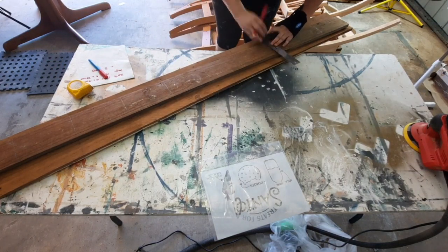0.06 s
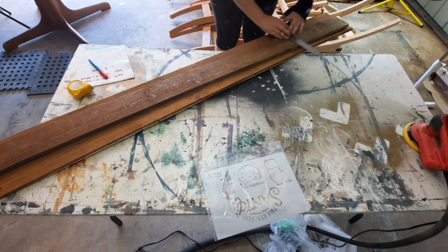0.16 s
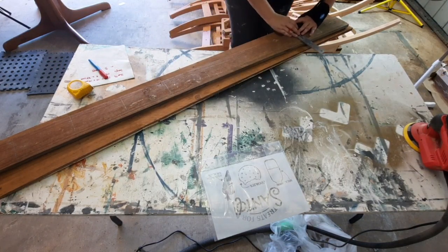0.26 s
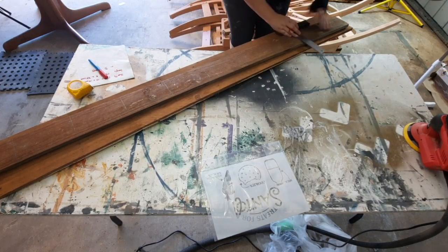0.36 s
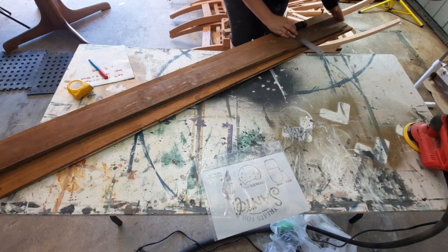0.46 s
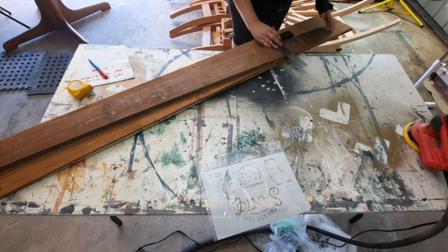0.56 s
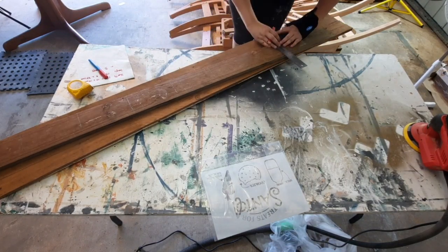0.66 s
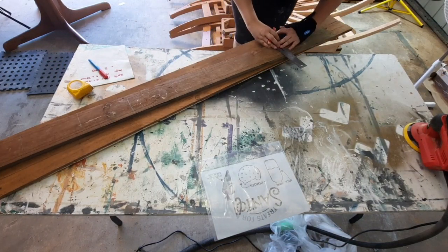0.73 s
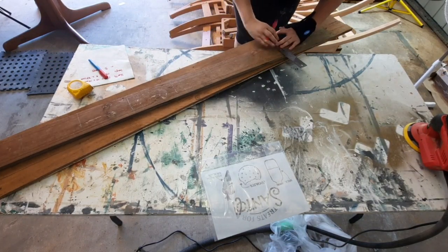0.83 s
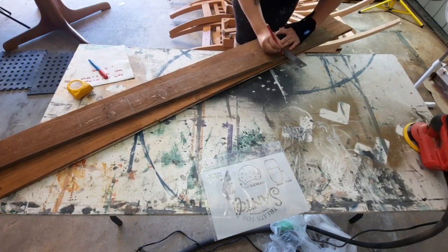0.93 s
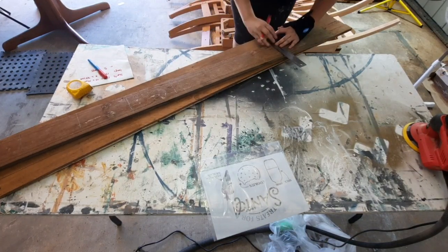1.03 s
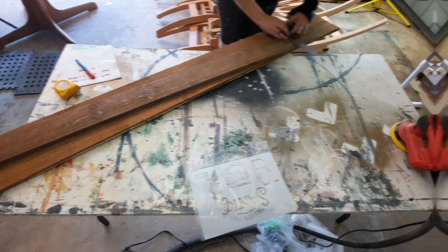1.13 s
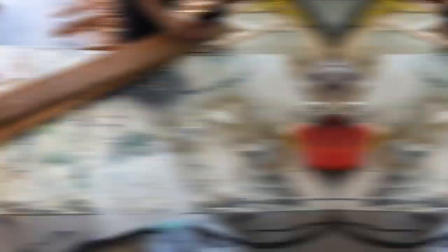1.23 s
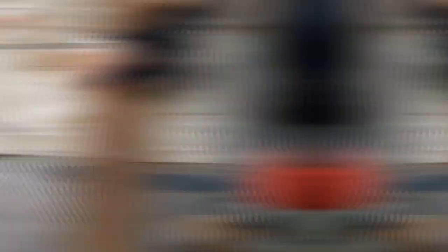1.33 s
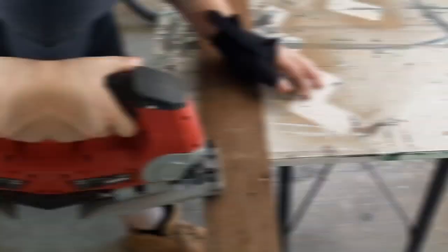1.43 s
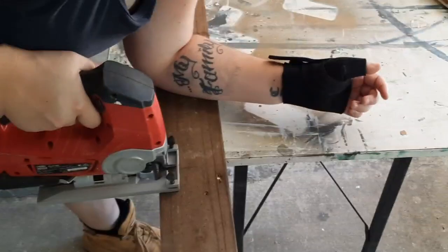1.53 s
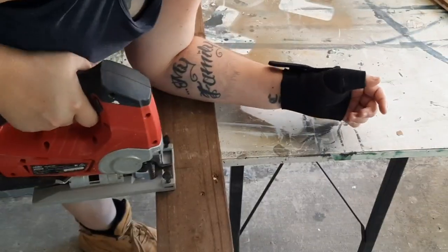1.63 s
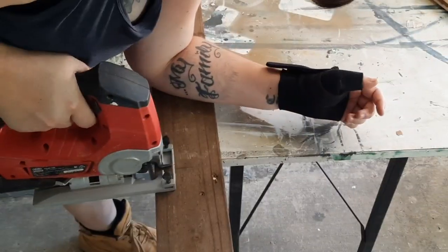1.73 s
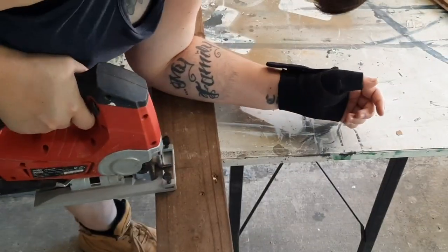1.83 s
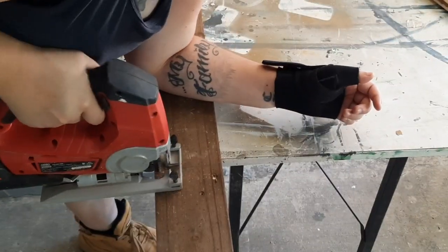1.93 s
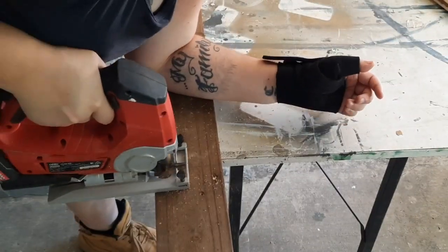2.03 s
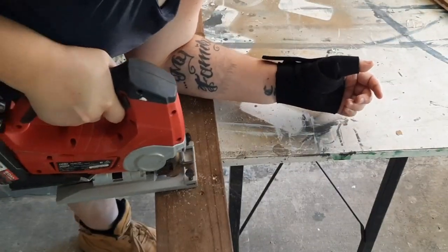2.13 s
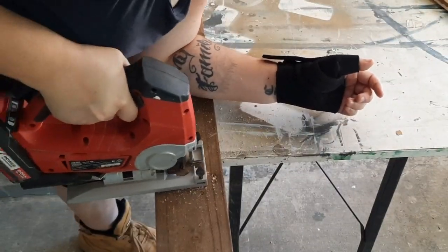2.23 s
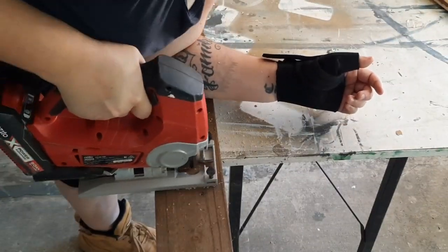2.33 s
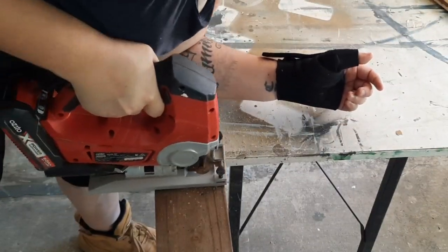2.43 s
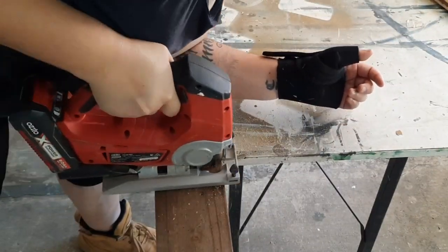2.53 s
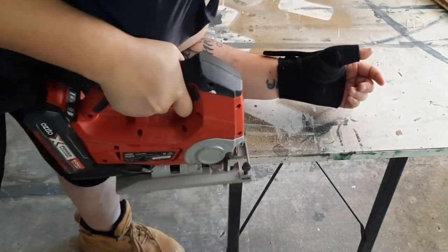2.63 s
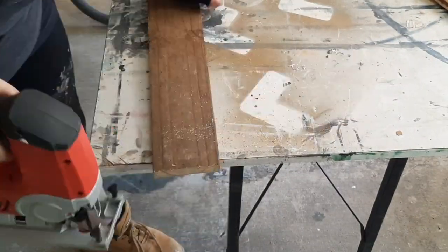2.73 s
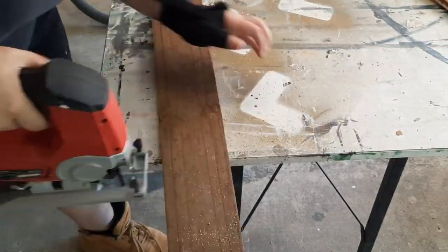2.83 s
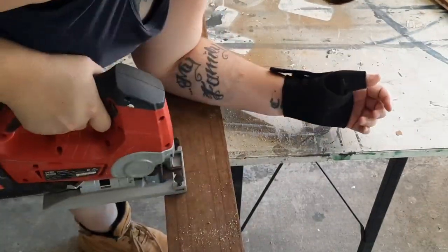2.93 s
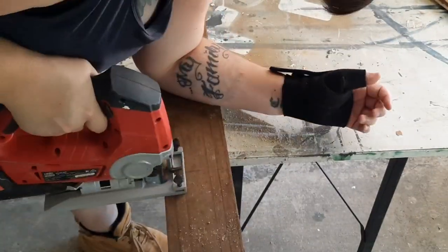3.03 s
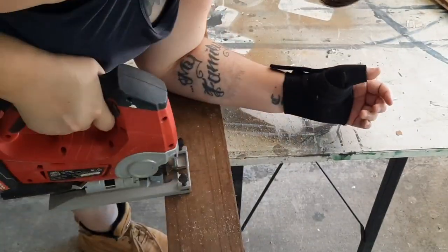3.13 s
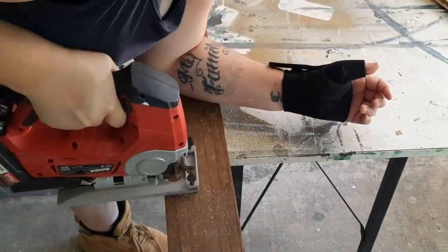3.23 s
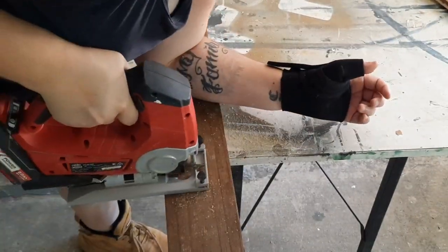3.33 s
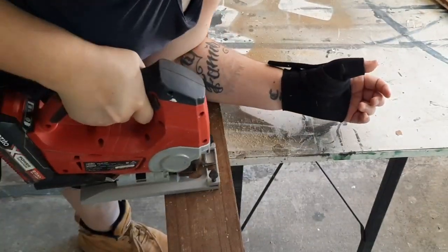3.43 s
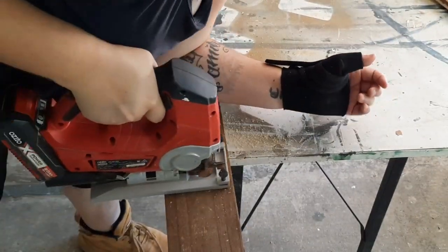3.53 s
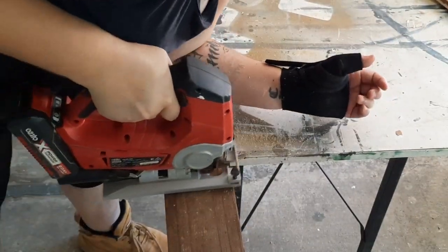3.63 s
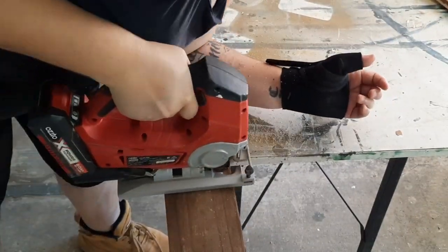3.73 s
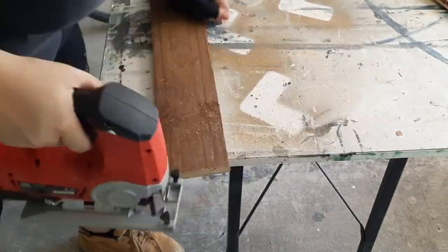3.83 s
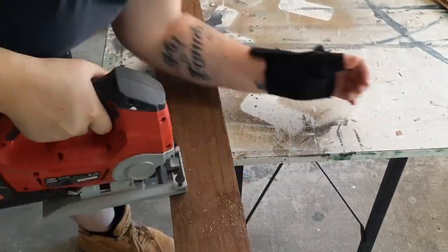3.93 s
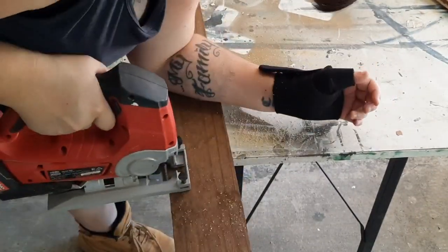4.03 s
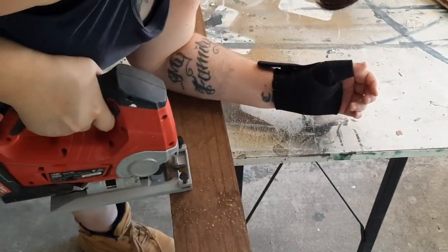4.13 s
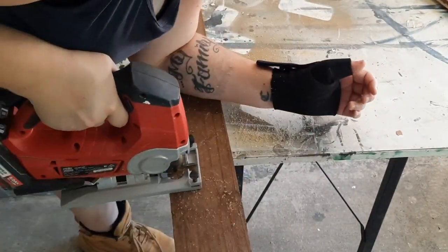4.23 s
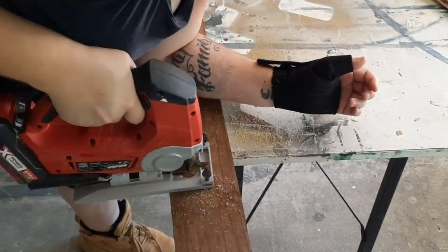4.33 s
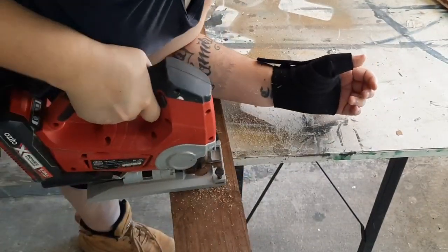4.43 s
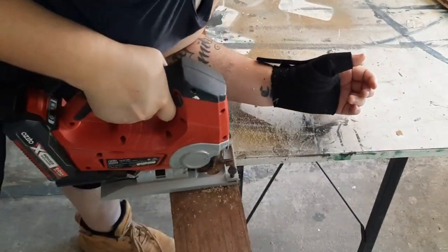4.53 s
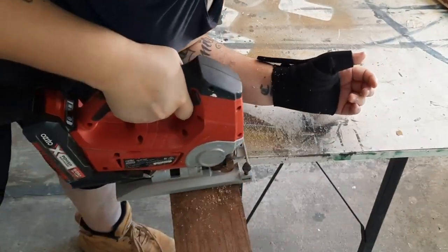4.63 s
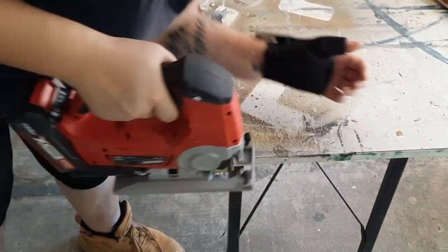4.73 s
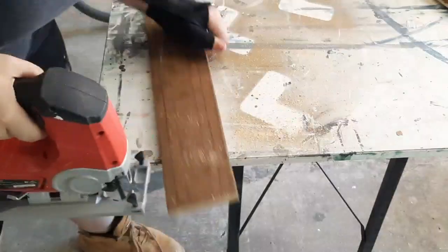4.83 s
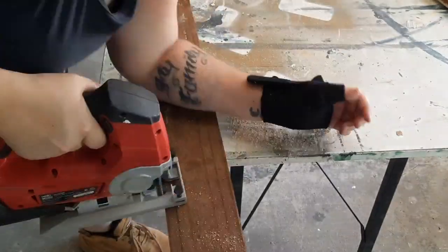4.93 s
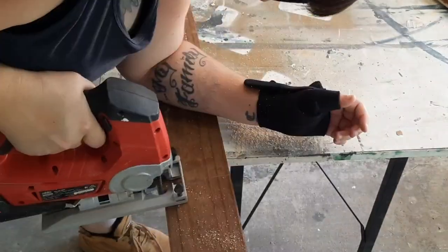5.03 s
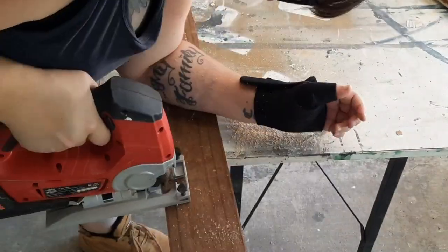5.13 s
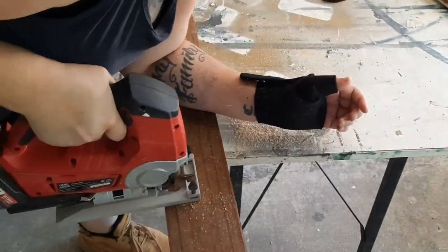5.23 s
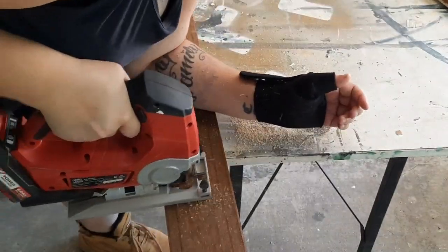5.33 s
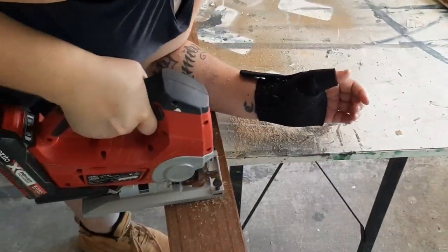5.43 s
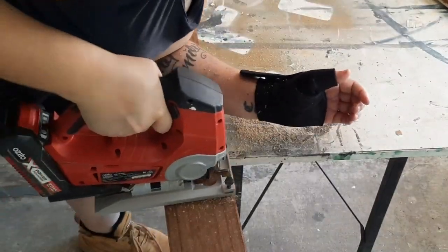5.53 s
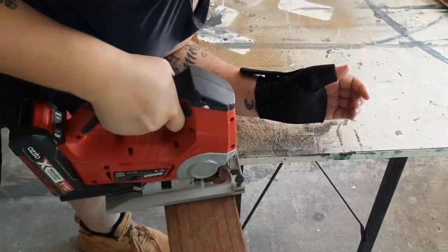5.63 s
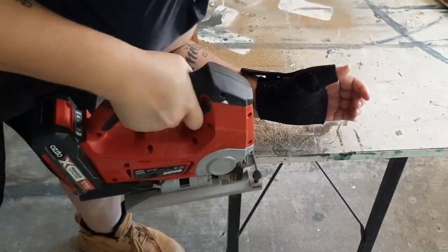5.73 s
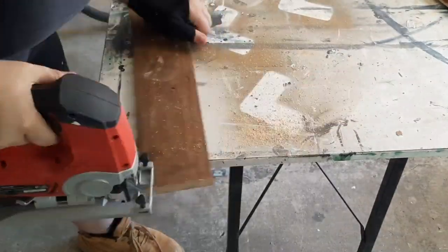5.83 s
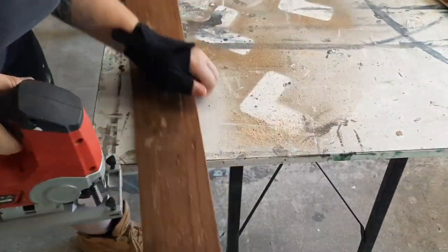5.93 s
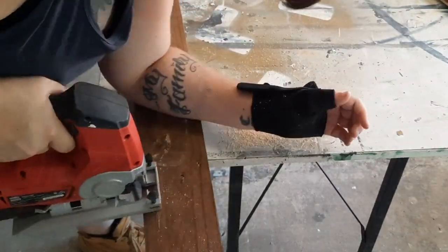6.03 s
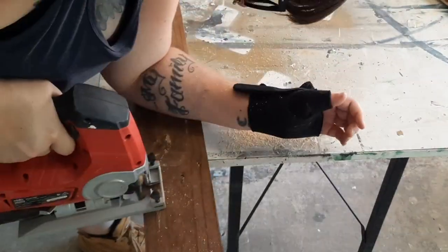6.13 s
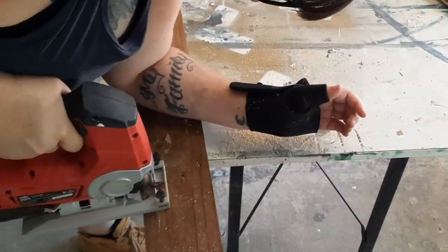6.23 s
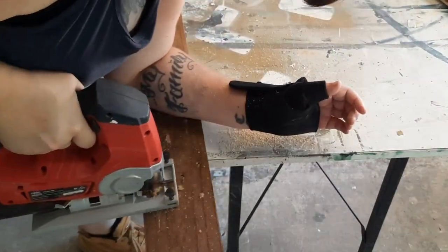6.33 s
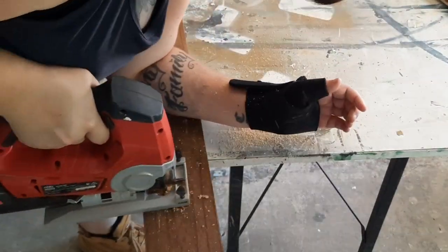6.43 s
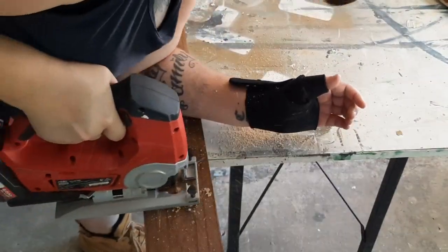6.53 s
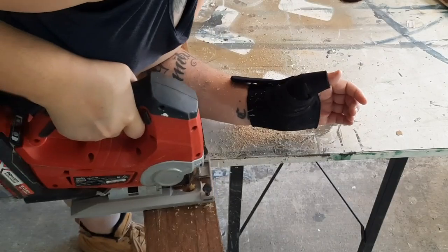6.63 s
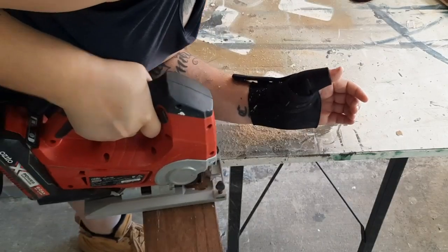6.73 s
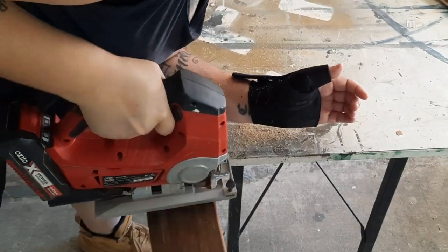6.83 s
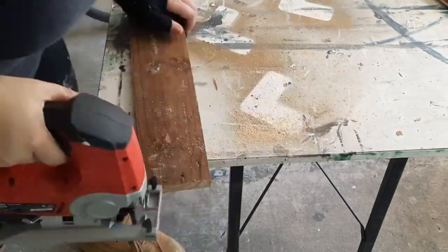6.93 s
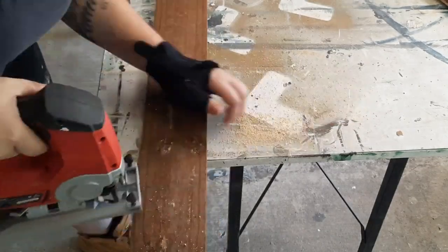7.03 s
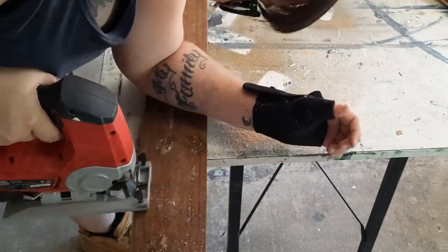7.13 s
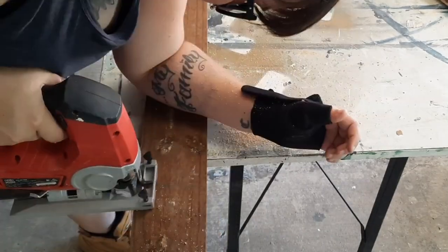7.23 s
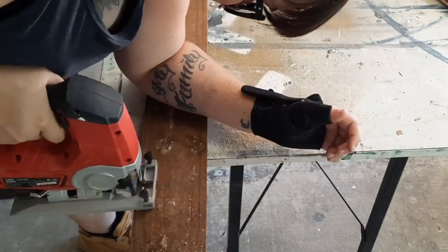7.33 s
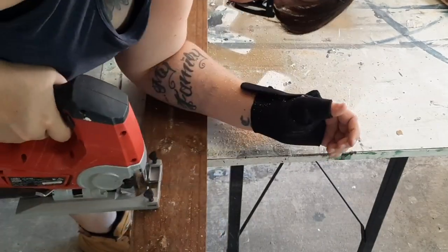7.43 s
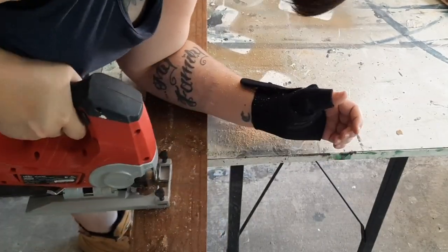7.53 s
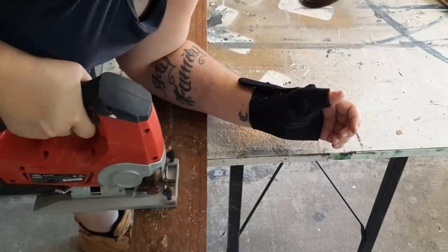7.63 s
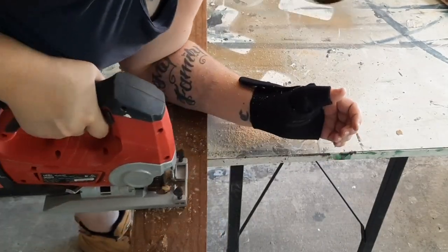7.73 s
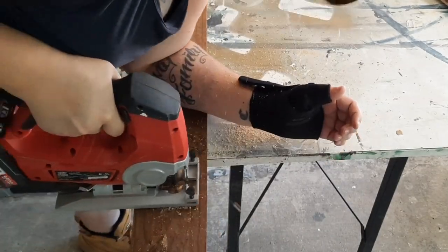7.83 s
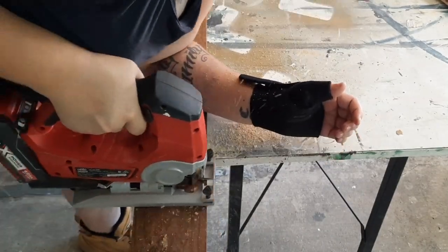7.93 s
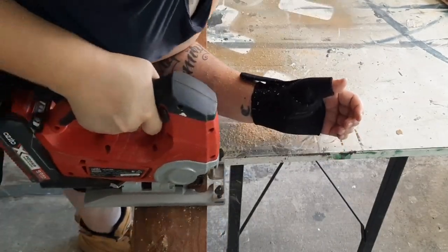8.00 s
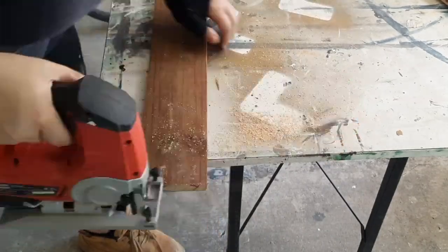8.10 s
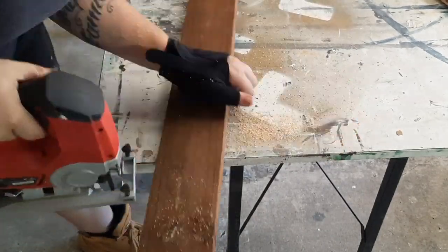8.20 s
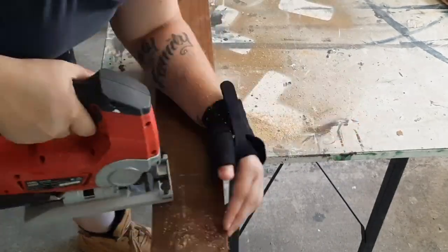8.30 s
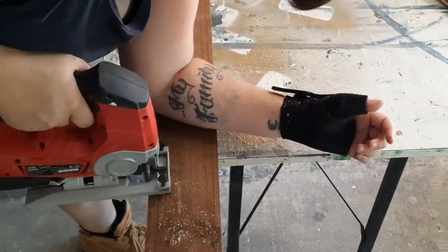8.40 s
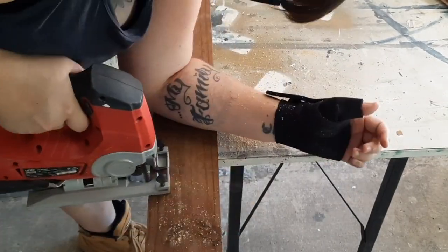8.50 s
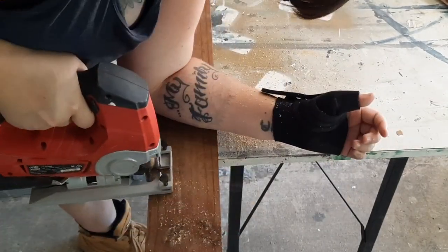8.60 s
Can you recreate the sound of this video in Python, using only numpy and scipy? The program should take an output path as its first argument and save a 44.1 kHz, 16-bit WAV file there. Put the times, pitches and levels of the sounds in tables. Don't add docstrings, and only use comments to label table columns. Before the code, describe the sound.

From 0 to about 1.3 s, a quiet shed with low, far rumble: a steel square and pencil scrape, ring and tap on timber, with knocks near 0.5 and 1.1 s and faint high bird chirps outside. The rumble fades out and a faint fan hum and air creep in. At 1.8 s a cordless jigsaw starts abruptly, close and loud, with harsh wood rasp, metallic gear rattle around a nasal mid pitch and a booming board, until 2.65 s. More cuts run at 3.0-3.75, 4.1-4.7, 5.05-5.75, 6.1-6.85 and 7.35-8.05 s, surging as the saw is pushed. Each stops in a short stuttering squeal, followed by wooden clacks, soft thuds and slight board rubs while hum and air recover. Clacks cluster near 6.7 and 8.1 s. A final brief cut starts at 8.53 s. The whole sound flutters slightly.

```python
import sys
import numpy as np
from scipy import signal
from scipy.fft import rfft, irfft
from scipy.io import wavfile
from scipy.ndimage import uniform_filter1d

SR = 44100
rng = np.random.default_rng(int(sys.argv[2]) if len(sys.argv) > 2 else 0)


def invert_db(level):
    return 10 ** (np.asarray(level, dtype=float) / 20)


def wav_record(signal):
    frames = np.transpose(np.atleast_2d(signal))
    bounded = np.clip(frames, -1, 1)
    quanta = np.round(bounded * 32767).astype(np.int16)
    wavfile.write(sys.argv[1], SR, quanta)


N = 381906
HOP, FIRST = 1024, 400
COUNT = N // HOP + 2
MIDDLE = (FIRST + HOP * np.arange(COUNT)) / SR
HZ = np.fft.rfftfreq(2 * HOP, 1 / SR)

# (frequency [Hz], density [dB per Hz])
RASP = [(290, -41), (500, -12.5), (569, -14.5), (677, -2.5), (793, -7), (1280, -5), (1800, -10), (2050, -3),
        (3160, -6.5), (7620, -15.5), (10000, -20.5), (12300, -17), (15700, -23)]
# (start [s], end [s])
TRIGGER = [(1.8, 2.645), (3.002, 3.759), (4.088, 4.711), (5.064, 5.733), (6.104, 6.87), (7.326, 8.055),
           (8.529, 8.68)]


def jigsaw():
    # (frequency [Hz], bandwidth [Hz])
    casing = [(1400, 52), (1490, 115), (1622, 51), (1700, 8.2), (1771, 40), (1860, 27), (1945, 47),
              (2150, 8), (2420, 13), (2640, 42)]
    # (frequency [Hz], bandwidth [Hz], level [dB])
    board = [(88, 46, -17.5), (131.4, 13.5, -1.5), (184, 18.7, -5.5), (308, 17.3, -1.5), (400.6, 13, 1),
             (498.5, 26.4, -5.5), (689, 99, -10), (847, 18.5, -8), (968, 24, -7)]
    rasp_db, board_db, gear_hz, gear_db = cutting()
    load = rasp_db + 1.33 * rng.standard_normal(COUNT)
    gear_hz = (gear_hz * (1 + 0.008 * rng.standard_normal(COUNT)))[:, None]
    mesh = (ring(gear_hz, 250) + 0.32 * ring(2430, 600)) * (0.14 + modes(casing, scatter_db=3.5))
    gear_db = load + gear_db - 0.7 + 0.35 * rng.standard_normal(COUNT)
    board_db = load + board_db + 0.54 + 0.096 * rng.standard_normal(COUNT)
    body = level(mesh, gear_db) + level(modes(board, scatter_db=2.5), board_db)

    rasp = level(invert_db(along(RASP)), load + 5.64)
    bite = 1 / (1 + (HZ / 2900) ** 4)
    air_swells = strokes(depth_db=6.5) * lumps(depth_db=1.0, size=30)
    tooth_swells = strokes(depth_db=9) * lumps(depth_db=2.5, size=140)
    jolts = strokes(depth_db=7) * lumps(depth_db=2.3, size=120)
    air = heard(rasp * np.sqrt(1 - bite), air_swells)
    teeth = heard(rasp * np.sqrt(bite), tooth_swells)
    return air + teeth + heard(body, jolts, locked=0.75)


def cutting():
    # (rasp [dB], board [dB], rattle re rasp [dB])
    cut_levels = [(-43, -45.5, -.5), (-42.5, -45, 0.5), (-43, -44, 1.1), (-43, -45.5, 0),
                  (-44.5, -48.5, -1), (-41.5, -43, -1.5), (-42, -47, -8.5)]
    # (middle [s], push [dB], half length [s])
    pushes = [(1.917, 4, 0.053), (2.135, 5, 0.047), (2.274, 3.5, .04), (2.445, 8, 0.07),
              (2.604, 1.5, 0.049), (3.134, 3.5, 0.051), (3.34, 4.5, 0.043), (3.626, 8.5, 0.072),
              (4.146, 0, 0.072), (4.24, 3, 0.063), (4.364, -0.5, 0.033), (4.575, 4, 0.06),
              (5.157, 5.5, 0.039), (5.331, 5, 0.051), (5.418, -0.5, 0.04), (5.56, 8.5, 0.08),
              (6.178, 6, 0.043), (6.299, 8, 0.066), (6.41, 8, 0.031), (6.516, 5.5, 0.055),
              (6.687, 10.5, 0.12), (7.444, 4, 0.047), (7.58, -2, 0.051), (7.77, -1.5, .06),
              (7.911, 2, 0.021), (8.65, 10, 0.03)]
    # (time [s], rate [Hz], rattle re its usual level [dB])
    mesh_curves = [
        [(1.82, 1640, -0.5), (1.988, 1550, -2), (2.04, 1820, -6), (2.132, 1690, 1), (2.19, 1840, -1.5),
         (2.53, 1780, 1.5), (2.556, 1900, -0.5), (2.64, 1800, -2)],
        [(3.01, 1790, 3), (3.092, 1850, -0.5), (3.174, 1760, 1.5), (3.238, 1880, -3), (3.338, 1810, 0),
         (3.49, 1970, -1), (3.626, 1640, 0), (3.75, 1950, -6)],
        [(4.1, 1630, -5.5), (4.172, 1640, 1), (4.252, 1830, -0.5), (4.484, 1890, -1.5), (4.554, 1740, -0.5),
         (4.7, 1870, 0)],
        [(5.07, 1770, 0.5), (5.098, 1850, -1.5), (5.204, 1710, 1.5), (5.424, 1910, -3), (5.576, 1570, -2),
         (5.72, 1900, -2.5)],
        [(6.12, 1840, -12), (6.204, 1660, 0.5), (6.266, 1620, 3), (6.312, 1880, -0.5), (6.496, 1840, -1),
         (6.746, 1750, -0.5), (6.86, 1840, -6.5)],
        [(7.35, 1700, 7), (7.418, 1610, -5), (7.448, 1750, 0.5), (7.624, 1910, -3), (7.738, 1750, 2.5),
         (7.772, 1900, 0.5), (7.926, 1740, 2), (8.05, 1815, 0)],
    ]
    spin_up_db, spin_up_s = 9.5, 0.0033
    exit_db, exit_s = 1.5, 0.14
    rasp_follows, rattle_follows = 0.25, 0.49
    rattle_late_db, bite_s = 4, 0.13

    cuts = np.hstack([TRIGGER, cut_levels])
    start, end, rasp_db, board_db, rattle_db = cuts[latest(cuts[:, 0], MIDDLE)].T
    since, left = abs(MIDDLE - start), abs(end - MIDDLE)
    on = (MIDDLE >= start) & (MIDDLE <= end)
    s, push_db, half_s = np.transpose(pushes)[..., None]
    bump = np.exp(-((MIDDLE - s) / half_s) ** 2)
    push = np.sum(bump * push_db, axis=0)
    mesh_hz, grind_db = per_slice(np.vstack(mesh_curves))
    edges_db = spin_up_db * np.exp(-since / spin_up_s) + exit_db * np.exp(-left / exit_s)
    rattle_db = rattle_db + grind_db + (rattle_follows - rasp_follows) * push
    rattle_db = rattle_db + rattle_late_db * (1 - np.exp(-since / bite_s))
    rasp_db = rasp_db + rasp_follows * push
    return np.where(on, rasp_db - edges_db, -150), board_db + push - rasp_db, mesh_hz, rattle_db


def snags():
    # (time [s], peak [dB], ring [Hz])
    snag_rows = [(1.883, -29, 640), (2.024, -32, 1830), (2.253, -30, 1740), (2.488, -26, 1750),
                 (2.537, -31, 1920), (2.997, -27, 1125), (3.3, -21, 1765), (3.583, -29, 997),
                 (3.672, -30, 1764), (3.73, -28, 1910), (4.299, -29, 1800), (4.387, -26, 1830),
                 (4.442, -32.5, 2300), (4.578, -25.5, 1744), (4.649, -25, 1830), (4.672, -28, 1910),
                 (5.085, -23, 964), (5.133, -26, 1750), (5.291, -25, 1753), (5.446, -29, 1880),
                 (5.556, -26, 910), (5.578, -30, 1590), (5.655, -28.5, 1770), (5.673, -23.5, 1830),
                 (5.695, -28, 1890), (6.44, -32, 1910), (6.593, -30, 1750), (6.837, -31, 1930),
                 (7.391, -26.5, 1580)]
    return bursts(snag_rows, rise_s=0.0012, fall_s=0.012, db=-6)


def drums():
    # (time [s], peak [dB], ring [Hz])
    drum_rows = [(1.936, -32, 525), (2.024, -38, 392), (2.141, -31, 473), (2.256, -36, 442),
                 (2.411, -33, 495), (2.995, -35, 480), (3.14, -33, 407), (3.312, -35, 497),
                 (3.58, -33, 390), (4.095, -31, 470), (4.322, -35, 406), (4.882, -39.5, 446),
                 (5.105, -39, 503), (5.185, -35, 288), (5.272, -30.5, 415), (5.555, -30, 437),
                 (5.823, -45, 386), (5.968, -42, 296), (6.617, -35, 404), (6.677, -42, 323),
                 (6.805, -40, 296), (7.019, -45, 344), (7.335, -36, 527), (7.437, -32, 382),
                 (7.475, -29, 408), (7.925, -29.5, 420)]
    return bursts(drum_rows, rise_s=0.0023, fall_s=0.017, db=-3)


def brake():
    # (time [s], length [s], main ring [dB], low ring re main [dB], high ring re main [dB])
    squeals = [(2.656, 0, -33.5, 3, -10), (2.703, 0, -44, 2, -5), (2.726, 0.01, -48.5, 6, -14),
               (3.794, 0, -46, 2, 5), (3.84, 0, -51, 6, -8), (4.746, 0.012, -36, -7, -8),
               (4.792, 0, -47, 5.5, -11), (5.768, 0, -46.5, 2, -2), (5.791, 0, -66, 18, 0),
               (6.882, 0.027, -38, -3, -10), (8.066, 0, -39, 5, -15), (8.09, 0, -66, 17, -6)]
    # (frequency [Hz], bandwidth [Hz])
    housing = [
        (2470, 75),
        (1460, 160),
        (3470, 170),
        (5070, 60),
        (5700, 50),
    ]
    # (frequency [Hz], density [dB per Hz])
    whirr_points = [(60, -38), (150, 10), (400, 7), (900, 8.5), (2000, 15.5), (3200, 11.5), (7600, -6),
                    (10000, -25), (12300, -23), (15800, -44)]
    whirr_under_db = -16
    squeal_db = in_slices(squeals, arch_db=8)
    main_db, low_db, high_db = squeal_db + 1.1 * rng.standard_normal((3, COUNT))
    whirr_db, whine_db, grip_hz = coasting()
    tune = 1 + 0.0069 * rng.standard_normal((5, COUNT, 1))
    tune[:2] *= grip_hz[..., None] / np.array(housing)[:2, :1, None]
    main, low, high, *top = [ring(hz * k, w) * ring(hz * k, 11 * w) for (hz, w), k in zip(housing, tune)]
    rings = level(main + 0.03 * sum(top), main_db + 0.33)
    rings = rings + level(low, main_db + low_db - 8.5) + level(high, main_db + high_db - 3.0)
    whine = level(invert_db(along(RASP)) * (HZ > 5000), whine_db)
    whirr = level(invert_db(along(whirr_points)), np.maximum(whirr_db, main_db + whirr_under_db) + 10.0)
    return heard(rings + whine + whirr, lumps(depth_db=3.5, size=220), locked=0.22)


def coasting():
    # (time [s], coasting [s], whirr [dB], main ring [Hz], low ring [Hz])
    stops = np.array([(2.656, .015, -46.5, 2483, 1420), (3.771, .035, -50, 2400, 1430),
                      (4.723, .075, -52, 2350, 1480), (5.744, .03, -54, 2460, 1500),
                      (6.882, .03, -56.5, 2464, 1300), (8.066, .03, -58.5, 2360, 1410)])
    whirr_fall_db, whine_fall_db = 68, 330
    whine_re_whirr_db = -10
    half_slice = HOP / SR / 2
    s, length, whirr_db, *grip_hz = stops[latest(stops[:, 0], MIDDLE + half_slice)].T
    since = MIDDLE - s
    on = (since > -half_slice) & (since < length)
    whine_db = np.where(on, whirr_db + whine_re_whirr_db - whine_fall_db * since, -150)
    return np.where(on, whirr_db - whirr_fall_db * since, -150), whine_db, np.array(grip_hz)


def walls(x):
    tail_db, t60_s = -21.5, 0.089
    t = np.arange(SR // 4) / SR
    tail = uniform_filter1d(rng.standard_normal((2, len(t))), size=4) * invert_db(-60 * t / t60_s)
    return x + invert_db(tail_db) * signal.fftconvolve(x, tail / np.linalg.norm(tail[0]), axes=1)[:, :N]


def clacks():
    # (time [s], peak [dB], ring [Hz], t60 [s])
    clack_rows = [(0.485, -33, 930, 0.035), (1.125, -36, 1040, 0.051), (3.605, -29, 1516, 0.029),
                  (3.832, -37.5, 1180, 0.063), (5.776, -34, 1470, 0.046), (6.693, -24, 880, 0.032),
                  (6.718, -19.5, 860, 0.037), (4.092, -29, 850, 0.061), (6.125, -33.5, 993, 0.11),
                  (7.347, -29, 1620, 0.062), (8.6, -32.5, 1045, 0.069), (7.928, -23.5, 818, 0.035),
                  (8.067, -23.5, 1310, 0.044), (8.077, -23, 1510, 0.017), (8.111, -21, 1186, 0.042)]
    return knocks(clack_rows, spread=0.038, puff=0.89, puff_hz=2840, tick=0.013)


def thuds():
    # (time [s], peak [dB], ring [Hz], t60 [s])
    thud_rows = [(2.832, -39, 194, 0.095), (3.899, -48.5, 362, 0.11), (4.876, -34.5, 417, 0.089),
                 (5.825, -40, 507, 0.057), (5.845, -38, 380, 0.057), (5.967, -30.5, 303, 0.042),
                 (7.016, -32, 357, 0.071), (8.246, -44.5, 323, 0.12)]
    return knocks(thud_rows, spread=0.083, puff=0.41, puff_hz=2040, tick=0)


def rubs():
    # (time [s], length [s], scrape [dB], bench boom re scrape [dB], hiss re scrape [dB])
    drags = [(.009, 0.032, -40.5, -2.5, -13), (.102, 0.012, -42.5, 1, -18), (.148, 0.038, -48, 2.5, -7),
             (.473, 0.068, -37.5, 2, -12), (.961, 0.053, -46.5, -6, -11.5), (1.124, 0.049, -52.5, 4, -7),
             (5.93, 0.025, -57, 1, -17.5), (7.021, 0, -48.5, -1, -30), (8.229, 0.018, -60, 1, -15)]
    # (time [s], scrape [dB], bench boom re scrape [dB], hiss re scrape [dB])
    shoves = [(2.842, -75, 24, -30), (3.91, -84, 22, -30), (4.073, -63, -12, -8), (4.885, -58, 8, -54),
              (5.838, -73, 15, -30), (5.861, -76, 3, -30), (6.975, -70, -9, -21), (8.3, -67, 3, -15),
              (1.5, -84, -3, 2), (6.005, -82.5, 0, 7.5), (7.155, -86.5, 0, 7.5), (8.37, -77, 11, -1),
              (2.87, -83, 0, 4)]
    # (frequency [Hz], bandwidth [Hz])
    square = [(880, 100), (1120, 48), (1680, 81), (2450, 21), (2850, 97)]
    # (frequency [Hz], density [dB per Hz])
    scrape_points = [(300, -27), (700, 11.5), (1100, 7.5), (1700, 12.5), (2600, 7), (4000, -12),
                     (5000, -49)]
    boom_points = [(50, -47), (110, 3.5), (200, -7.5), (380, -6), (600, -12.5), (900, -58.5)]
    hiss_points = [(2500, -8.5), (3500, 5.5), (7500, -1), (9500, -10), (12500, -7.5), (15900, -18)]
    rows = [*drags, *[(s, 0, *db) for s, *db in shoves]]
    scrape_db, boom_db, hiss_db = in_slices(rows, arch_db=12.5) + 1.1 * rng.standard_normal((3, COUNT))
    laid_on = np.where(MIDDLE < 0.12, 0.6, 0.3)[:, None]
    steel = np.abs(modes(square, scatter_db=8.5)) * laid_on
    colour = level(invert_db(along(scrape_points)) * (0.35 + steel), scrape_db + 0.36)
    colour = colour + level(invert_db(along(boom_points)), scrape_db + boom_db + 0.19)
    colour = colour + level(invert_db(along(hiss_points)), scrape_db + hiss_db + 5.5)
    return heard(colour, lumps(depth_db=2.5, size=60), lag=0)


def sings():
    # (time [s], peak [dB], ring [Hz])
    sing_rows = [(.018, -29, 870), (.024, -31, 2410), (.026, -46, 3850), (.14, -40, 707), (.162, -45, 1850),
                 (.965, -45, 2150), (.98, -41, 2400), (.985, -49, 1500), (1.135, -51, 1700),
                 (1.15, -48, 2710), (3.782, -46, 1400), (3.788, -46, 2100), (.088, -35, 1716),
                 (.09, -39, 1100), (.092, -54, 2830), (2.7, -50, 3400), (2.75, -62, 1750),
                 (2.77, -56.5, 1800), (2.812, -64, 1800)]
    return bursts(sing_rows, rise_s=0.004, fall_s=0.018, db=-1.0)


def birds():
    # (time [s], pitch of the strong octave [Hz], glide [Hz], level [dB])
    chirps = [(.218, 5600, -500, -55.5), (0.323, 5040, 847, -59), (.45, 5400, 2, -62), (.566, 5720, 0, -59),
              (.682, 5600, 0, -69), (.798, 5800, 2, -63), (.915, 5960, -200, -57), (1.03, 5230, -1, -58),
              (1.146, 5540, -4, -63), (1.263, 5150, 498, -71.5)]
    out, t = np.zeros((2, N)), (np.arange(2 * HOP) - HOP) / SR
    for s, hz, glide, db in chirps:
        waver = np.cumsum(rng.standard_normal((2, 2 * HOP)), axis=1) * 0.08
        phase = np.pi * (hz * t + glide * t * t * SR / (2 * HOP)) + waver
        chirp = np.sin(2 * phase) + 0.86 * np.sin(phase) + 0.24 * np.sin(3 * phase)
        out[:, round(s * SR) - HOP:][:, :2 * HOP] += invert_db(db + 6.0) * chirp * np.hanning(2 * HOP)
    return out


def fan():
    # (frequency [Hz], level [dB])
    partials = [
        (145.3, -61),
        (296.1, -64.5),
        (581.4, -81),
        (726.7, -87),
    ]
    # (frequency [Hz], density [dB per Hz])
    air_points = [(20, -16), (70, -6), (150, -0.5), (230, -9.5), (330, -2.5), (450, -8.5), (600, -9.5),
                  (1170, -18), (1600, -16.5), (2600, -22.5), (4000, -35.5), (6000, -54)]
    treble_points = [(2000, -41), (3500, -5), (8000, -1.5), (9500, -6), (15700, -3)]
    hum_db, air_db, treble_db, top_db = recovery()
    t = np.arange(N) / SR
    drift, sway = [np.interp(t, MIDDLE, v) for v in rng.standard_normal((2, COUNT))]
    base_hz, base_db = partials[0]
    lines = sum(invert_db(db - base_db) * np.sin(2 * np.pi * hz * t + 0.07 * drift * hz / base_hz)
                for hz, db in partials)
    hum = lines * invert_db(np.interp(t, MIDDLE, hum_db) + 5.0 + 0.8 * sway)

    swell = 2.5 * rng.standard_normal(COUNT)
    air = level(invert_db(along(air_points)), air_db + swell + 8.0)
    bright = invert_db(along(treble_points))
    low = 1 / (1 + (HZ / 8800) ** 12)
    treble = level(bright * low, treble_db + 0.4 * swell - 5.0)
    treble = treble + level(bright * (1 - low), top_db + 0.73 * swell - 0.1)
    return hum * invert_db([[.8], [-.8]]) + heard(air + treble, lag=0)


def recovery():
    # (time [s], dip [dB], recovery [s], fan hum
    # [dB], air [dB])
    pauses = [(1.36, 26, 0.44, -53.5, -64), (2.76, 8.5, 0.056, -62, -63), (3.87, 17, 0.22, -55.5, -61.5),
              (4.82, 26, 0.23, -50, -60.5), (5.81, 8, 0.24, -59, -64.5), (6.94, 8.5, 0.025, -69.5, -67),
              (8.15, 3, 0.036, -70, -72)]
    hum_dips, treble_dips, top_dips = 1.7, 1.13, 1.3
    treble_re_air_db, top_re_air_db = -4, -11
    following = np.searchsorted(np.array(TRIGGER)[:, 0], MIDDLE)
    s, dip_db, rise_s, hum_db, air_db = np.array(pauses)[np.minimum(following, len(pauses) - 1)].T
    gain = 1 - (1 - invert_db(-dip_db)) * np.exp(-np.maximum(MIDDLE - s, 0) / rise_s)
    dip_db = 100 * (MIDDLE < pauses[0][0]) - 20 * np.log10(gain)
    treble_db = air_db + treble_re_air_db - treble_dips * dip_db
    top_db = air_db + top_re_air_db - top_dips * dip_db
    return hum_db - hum_dips * dip_db, air_db - dip_db, treble_db, top_db


def shed():
    # (time [s], level [dB])
    rumble_curve = [(0, -50.5), (.22, -48.5), (.53, -51.5), (.7, -48), (.95, -43), (1.05, -47),
                    (1.4, -48.5)]
    # (frequency [Hz], density [dB per Hz])
    rumble_points = [(12, -62), (20, -54), (70, 6), (113, -7), (164, -6.5), (282, -11), (400, -16),
                     (520, -43), (880, -120)]
    shed_points = [(120, -31), (200, -27), (293, -9), (717, -6), (909, -6), (1290, -9.5), (2530, -15),
                   (3510, -21), (8120, -28), (15700, -40)]
    fade_from_s, fade_to_s = 0.96, 1.352
    fade = (fade_to_s - MIDDLE) / (fade_to_s - fade_from_s)
    fade_db = 20 * np.log10(np.clip(fade, 1e-7, 1))
    rumble_db, air_db = per_slice(rumble_curve)[0] + fade_db, -52.5 + fade_db
    sway = rng.standard_normal((2, COUNT))
    colour = level(invert_db(along(rumble_points)), rumble_db + 1.0 + 3.6 * sway[0])
    colour = colour + level(invert_db(along(shed_points)), air_db + 4.5 + 0.21 * sway[1])
    return heard(colour, left=[(100, 1.5), (5000, 2.6)], lag=0,
                 alike=[(40, 0.3), (70, 0.98), (200, 0.96), (550, 0.32), (1600, 0.033)])


def knocks(rows, spread, puff, puff_hz, tick):
    out, t = np.zeros((2, N + SR)), np.arange(SR // 4) / SR
    band = signal.butter(3, [puff_hz / 4, puff_hz], "bandpass", fs=SR, output="sos")
    for s, db, hz, t60 in rows:
        ratios = np.array([1, 1.24, 1.6, 2.06])[:, None] * (1 + spread * rng.standard_normal((4, 1)))
        wander = 0.0076 * np.cumsum(rng.standard_normal((4, len(t))), axis=1)
        phases = 2 * np.pi * hz * ratios * t + wander + 0.67 * rng.standard_normal((2, 4, 1))
        body = np.sum(np.sin(phases) * np.array([0.61, 0.3, 0.17, 0.21])[:, None], axis=1)
        noise = rng.standard_normal((2, len(t)))
        bounces = 1 + 0.4 * np.cos(2 * np.pi * 140 * t - 0.8)
        shape = bounces * invert_db(-60 * t / t60) * (1 - np.exp(-t * hz))
        crack = tick * noise * invert_db(-60 * t / 0.025)
        tail_shape = invert_db(-60 * t / 0.38) * (1 - np.exp(-t / 0.006))
        tail = 0.027 * signal.sosfilt(band, noise[::-1]) * tail_shape
        blow = (body + puff * signal.sosfilt(band, noise)) * shape + crack + tail
        out[:, round(s * SR):][:, :len(t)] += invert_db(db + 2.5) * blow * invert_db([[1.7], [-1.7]])
    return out[:, :N]


def bursts(rows, rise_s, fall_s, db):
    out, t = np.zeros((2, N + SR)), np.arange(SR // 16) / SR
    shape = (1 - np.exp(-t / rise_s)) * np.exp(-(t / fall_s) ** 2)
    for s, peak_db, hz in rows:
        wander = 0.039 * np.cumsum(rng.standard_normal((2, len(t))), axis=1)
        lead = np.pi * hz * 6 / SR * np.array([[1], [-1]]) + 0.47 * rng.standard_normal((2, 1))
        tone = np.sin(2 * np.pi * hz * t + wander[0] + lead)
        tone = tone + 0.26 * np.sin(2.2 * np.pi * hz * t + wander[1] - lead)
        out[:, round(s * SR):][:, :len(t)] += invert_db(peak_db + db) * tone * shape * invert_db([[1.8], [-1.8]])
    return out[:, :N]


def strokes(depth_db, stroke_hz=53):
    start, speed = rng.random((2, COUNT, 1))
    turn = start + stroke_hz * (.9 + .2 * speed) * np.arange(2 * HOP) / SR
    since_jolt = (2 * turn) % 1
    g = invert_db(depth_db * (np.exp(-since_jolt / 0.87) + 0.19 * np.cos(2 * np.pi * turn)))
    return g / np.sqrt(np.mean(g ** 2))


def lumps(depth_db, size):
    g = uniform_filter1d(rng.standard_normal((COUNT, 2 * HOP)), size)
    g = invert_db(depth_db * g / g.std())
    return g / np.sqrt(np.mean(g ** 2))


def ring(hz, width):
    return 1j * HZ * width / (hz * hz - HZ * HZ + 1j * HZ * width + 1e-9)


def modes(table, scatter_db):
    shake = uniform_filter1d(rng.standard_normal((len(table), COUNT, 1)), size=3, axis=1)
    shake = invert_db(scatter_db * shake / shake.std())
    total = 0
    for k, (hz, width, *db) in enumerate(table):
        total = total + (-1) ** k * shake[k] * invert_db(sum(db)) * ring(hz, width)
    return total


def along(points, hz=HZ):
    f, v = np.transpose(points)
    return np.interp(np.log(hz + 1), np.log(f + 1), v)


def level(response, db):
    rms = np.sqrt(np.mean(np.abs(response) ** 2, axis=-1, keepdims=True))
    return response / rms * invert_db(db)[:, None]


def per_slice(rows):
    s, *cols = np.transpose(rows)
    return np.array([np.interp(MIDDLE, s, c) for c in cols])


def latest(starts, at):
    return np.maximum(np.searchsorted(starts, at) - 1, 0)


def in_slices(rows, arch_db):
    out = np.full((len(rows[0]) - 2, COUNT), -150.)
    for s, length, *cols in rows:
        u = (MIDDLE - s - length / 2) / (length / 2 + HOP / SR / 2)
        covered = abs(u) <= 1
        out[:, covered] = np.array(cols)[:, None]
        out[0, covered] -= arch_db * (length > 0) * u[covered] ** 2
    return out


def heard(colour, gate=0.69, alike=None, left=None, lag=6, locked=0.):
    # (frequency [Hz], coherence [0 to 1])
    usual_alike = [(40, .1), (70, .9), (150, .97), (400, .9), (1000, .64), (2000, .47), (4000, .38),
                   (8000, .2), (15000, .1)]
    # (frequency [Hz], level [dB])
    usual_left = [(60, 2), (150, 0.5), (380, 3.0), (950, 4), (2380, 3.5), (5000, 1), (9000, 4),
                  (15000, 7.5)]
    drive = rng.standard_normal((2, COUNT, 2 * HOP))
    stream = drive[..., :HOP]
    joined = np.concatenate([stream, np.roll(stream, -1, axis=1)], axis=2)
    noise = np.sqrt(1 - locked) * drive[:, ::-1] + np.sqrt(locked) * joined
    a, b = rfft(noise * gate) * colour
    turn = np.arccos(np.clip(along(alike or usual_alike), 0, 1)) / 2
    side = invert_db(along(left or usual_left) / 2) * np.exp(1j * np.pi * HZ * lag / SR)
    left_ear = (a * np.cos(turn) + b * np.sin(turn)) * side
    right_ear = (a * np.cos(turn) - b * np.sin(turn)) / side
    return join(irfft(np.array([left_ear, right_ear])))


def join(slices):
    faded = slices * np.hanning(2 * HOP) ** .93
    rising = np.pad(faded[..., :HOP], ((0, 0), (0, 1), (0, 0)))
    falling = np.pad(faded[..., HOP:], ((0, 0), (1, 0), (0, 0)))
    return (rising + falling).reshape(2, -1)[:, HOP - FIRST:][:, :N]


def scene():
    saw = jigsaw() + snags() + drums() + walls(brake())
    handling = clacks() + thuds() + rubs() + sings()
    return saw + handling + birds() + fan() + shed()


def band_limit(x):
    return signal.sosfilt(signal.butter(12, 15810, fs=SR, output="sos"), x)


def record(dry):
    ceiling, top_hz = 0.16, 15740
    held = dry / (1 + np.abs(dry / ceiling) ** 4) ** (1 / 4)
    kept = irfft(rfft(held) * (np.fft.rfftfreq(N, 1 / SR) < top_hz), N)
    return band_limit(kept)


dry = scene()
out = record(dry)
wav_record(out)
```